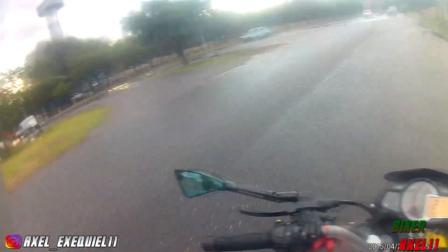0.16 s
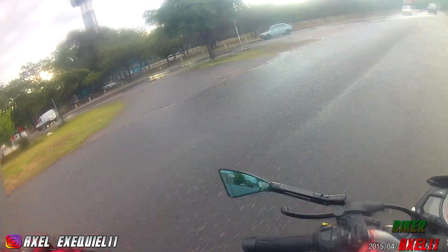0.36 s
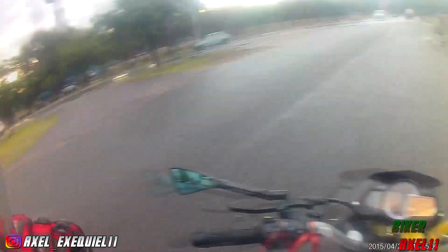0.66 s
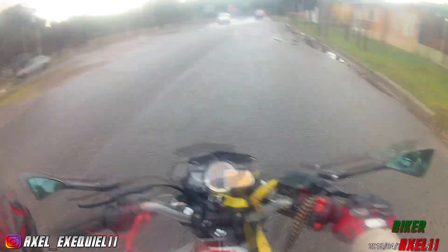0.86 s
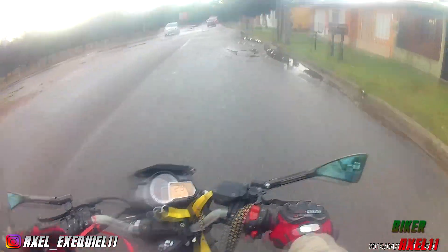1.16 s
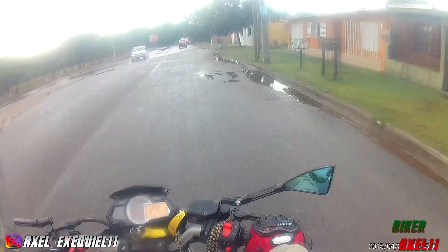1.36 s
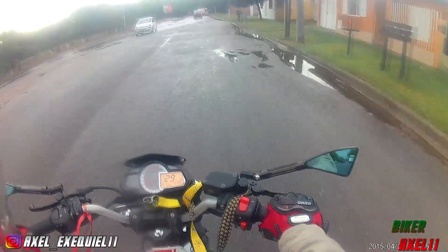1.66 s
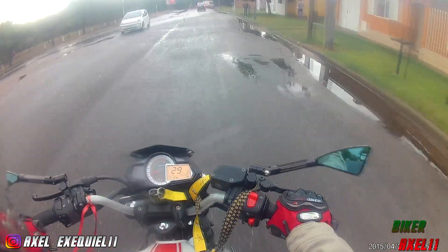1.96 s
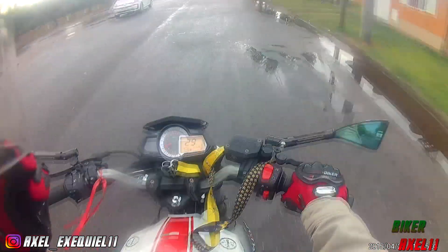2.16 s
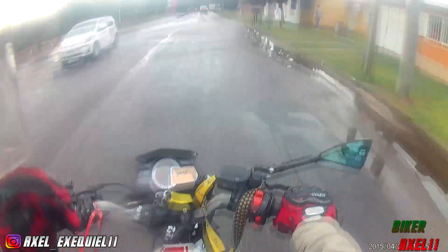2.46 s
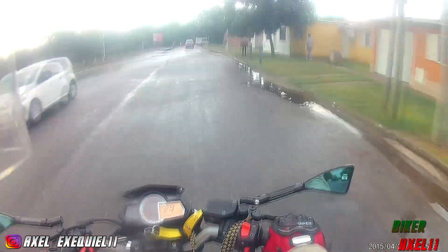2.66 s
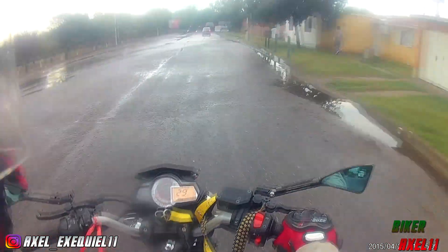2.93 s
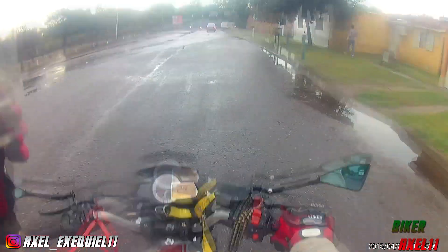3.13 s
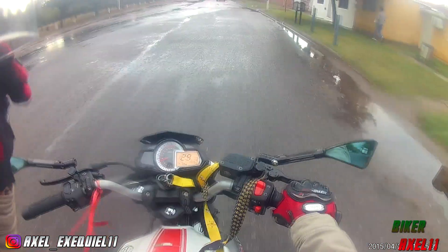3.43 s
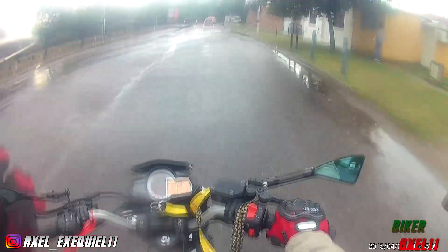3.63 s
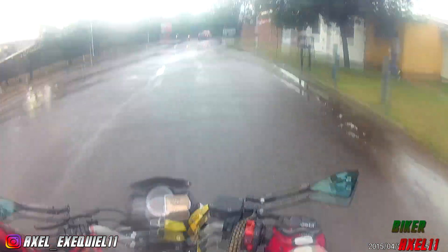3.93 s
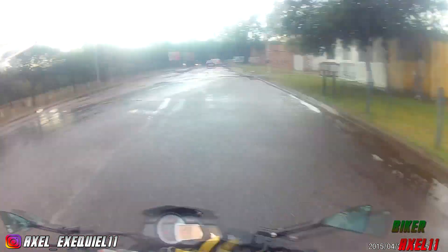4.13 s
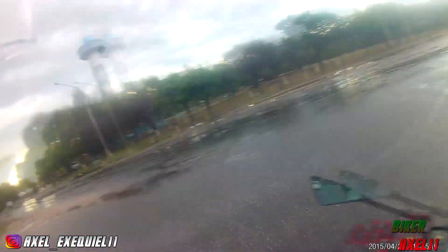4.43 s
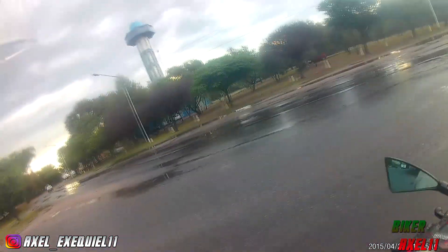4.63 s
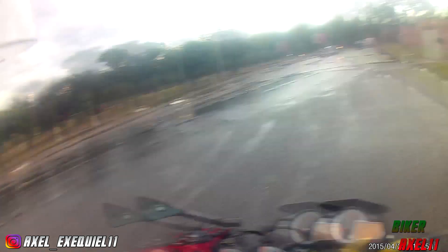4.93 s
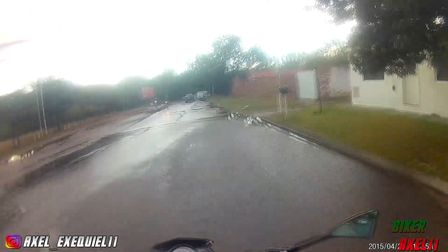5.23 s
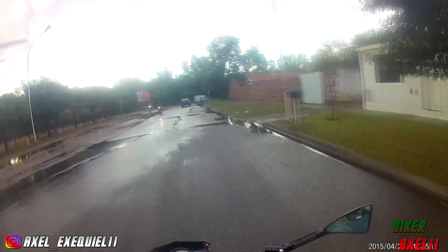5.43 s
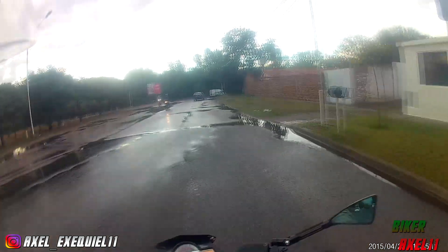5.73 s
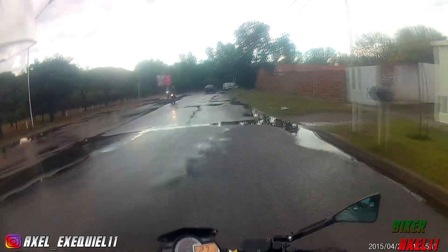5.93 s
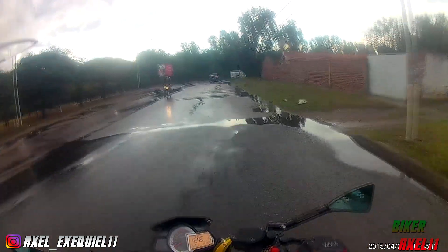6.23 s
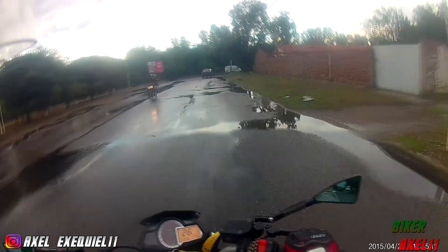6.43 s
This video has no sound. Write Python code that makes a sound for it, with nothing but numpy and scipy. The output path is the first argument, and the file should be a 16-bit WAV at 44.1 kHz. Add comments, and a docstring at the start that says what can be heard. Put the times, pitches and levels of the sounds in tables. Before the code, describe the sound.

Dull, booming bumps and plastic knocks jostle a camera case on a motorcyclist's helmet, the microphone shut inside. The bumps grow heavier, joined by two short runs of sharp clicks, and mostly stop after about four seconds. Underneath, tyres hiss softly on the wet road and the engine slowly winds down, both muffled. Wind and whirring rise near the start and again toward five seconds.

```python
"""Motorcycle on a wet street

A single-cylinder motorcycle coasts, heard from inside a sealed camera case on the rider's helmet.
Jolts excite the low modes of the helmet as thumps and scuff the case; a plastic ratchet joint slips
in short runs of sharp clicks. Tyre hiss, wind and the slowing engine arrive muffled by the case wall,
and hiss, wind and gear whirr swell when the rider looks aside."""
import sys
import numpy as np
from scipy import signal
from scipy.fft import rfft, irfft
from scipy.io import wavfile

SR = 44100
rng = np.random.default_rng(int(sys.argv[2]) if len(sys.argv) > 2 else 0)


def log_audio(samples):
    """Write samples as a 16-bit WAV file to the path given in sys.argv[1]."""
    # one column per channel
    frames = np.atleast_2d(samples).T
    # limit to full scale, then quantise
    limited = np.clip(frames, -1, 1)
    pcm = np.round(limited * 32767).astype(np.int16)
    wavfile.write(sys.argv[1], SR, pcm)


N = 290206
TIME = np.arange(N) / SR

# jolts that shake the helmet and scuff the case: start_s, thump_db, shudder_hz, swell_s, scuff_db
JOLTS = [(.399, -24, 108.7, 0.015, -54), (.634, -21.5, 125, 0.0098, -61), (0.672, -25.5, 158.4, 0.013, -41),
         (0.846, -22.5, 94.5, 0.0094, -36), (.872, -15.5, 172, 0.0062, -34),
         (1.63, -25.5, 186, 0.0071, -34.5), (1.642, -26, 121, 0.012, -35.5), (1.799, -28, 163, 0.0047, -40),
         (1.977, -35, 135.5, .013, -62), (2.047, -17.5, 122, 0.0036, -27.5),
         (2.084, -16.5, 125, 0.015, -40.5), (2.106, -8, 155.4, 0.0079, -20.5),
         (2.192, -16.5, 117, 0.004, -26), (2.371, -15, 180, .012, -33), (2.397, -14.5, 142.2, 0.018, -61.5),
         (3.049, -35, 145, 0.014, -45.5), (3.211, -5, 144, 0.0063, -13), (3.228, -12, 198.7, 0.011, -20.5),
         (3.255, -7.5, 189, 0.0087, -9.5), (3.555, -36, 169, 0.008, -39), (3.697, -14, 149, 0.0075, -26.5),
         (3.981, -32, 103.3, 0.018, -67), (4.484, -28.5, 131.5, 0.0082, -57)]
# the camera rocking on its mount after heavier jolts: start_s, level_db, rocking_hz
SWAYS = [(0.414, -24, 55), (0.692, -30, 51), (.86, -16.5, 51), (1.648, -31, 45.2), (2.109, -18, 73),
         (2.149, -14, 44.6), (3.178, -16.5, 51), (3.247, -10.5, 54), (3.714, -20, 78), (3.738, -22, 44)]
# hard plastic parts striking together: start_s, knock_db, edge_db
CLACKS = [(0.41, -47, -43.5), (0.65, -16, -39), (.667, -26, -32), (.695, -39.5, -53), (1.646, -34.5, -47),
          (3.269, -14.5, -23), (3.279, -18.5, -32), (3.7203, -29.5, -41.5), (3.728, -28, -44)]
# longer rubs on the case: start_s, knock_db, body_db, edge_db, decay_s
RUBS = [(0.392, -31.5, -45, -47, 0.016), (.52, -37.5, -65.5, -51.5, 0.11), (2.021, -33, -33.5, -53.5, 0.12),
        (2.356, -41.5, -33, -70, 0.022), (3.178, -33.5, -31.5, -48, 0.072), (3.246, -22, -32, -37, 0.0078),
        (3.778, -39.5, -39.5, -52.5, 0.073), (3.95, -43, -69, -48.5, 0.041)]
# slips of the ratchet: start_s, tooth_count, first_gap_s, relative_db, loudest_fraction
SLIPS = [(2.1316, 1, .025, -36.5, .5), (2.194, 4, .027, -34.5, .42), (3.213, 7, .0229, -29, .54),
         (3.415, 1, .025, -41.5, .5), (3.7554, 1, .025, -45, .5)]

# low modes of the helmet and its mount: pitch_hz, gain_db, t60_s
HELMET_MODES = [(42.85, 0, 0.46), (70.8, -12.5, 1), (109.6, -1, 0.45), (145.35, 0.5, 0.31), (159, 5, 0.1),
                (194.7, -12.5, 0.19), (237.3, -10, 0.11), (286.4, -15.5, 0.13), (413.6, -2, 0.1)]
# modes of the plastic case: pitch_hz, gain_db, t60_s
CASE_MODES = [(640, -13, 0.019), (748, 0.5, 0.022), (790, -7.5, 0.015), (905, -22, 0.0086),
              (1180, -3.5, 0.022), (1125, -7.5, 0.019), (1392, 11, 0.012), (1607, -0.5, 0.02),
              (1724, 15, 0.0077), (1956, 4, 0.02), (2020, -13.5, 0.0091)]
# mode of the air inside the case: pitch_hz, gain_db, t60_s
CAVITY_MODES = [(439.1, 0, 0.2)]
# modes of the ratchet's pawl: pitch_hz, gain_db, t60_s
PAWL_MODES = [(1456, 7.5, 0.025), (1542, 8, 0.025), (1920, -2, 0.033), (2255, 4, 0.016),
              (2690, -16.5, 0.018), (4080, -9.5, 0.012), (4520, 0.5, 0.0086), (5250, -8, 0.023),
              (5690, -13.5, 0.02), (6640, -11.5, 0.0062), (10200, -14, 0.0099), (12700, -19.5, .007),
              (14500, -20.5, .007)]

# the rider's looks to the side: middle_s, half_length_s
HEAD_TURNS = [(0.496, .28), (4.696, .37)]
# steady layers: base_db, fall_db (per tenth of the starting speed lost), head_turn_rise_db
WIND_LEVELS = (-51.5, 0.34, 5.9)
SPRAY_LEVELS = (-54, 1, 1.14)
FIZZ_LEVELS = (-69.5, 4.2, 0.29)
GEAR_LEVELS = (-59.5, -0.25, 4.4)
# spectrum of wet tyres through the case wall: frequency_hz, relative_db
MUFFLED_SPECTRUM = [(200, 4), (440, -1.5), (540, -1), (750, -1.5), (970, -4), (1120, -2), (1350, 4),
                    (1550, -3), (1800, 1), (2000, -4.5), (2350, -14), (3100, -26), (4200, -21.5),
                    (5300, -37.5), (7600, -35)]

# firing rate of the slowing engine: time_s, rate_hz
FIRING_RATE = [(0, 38.8), (1.35, 37.32), (2.85, 36.34), (4.25, 34.58), (4.75, 33.96), (5.3, 33.48),
               (5.8, 33.14), (6.58, 33)]
# harmonics of the firing rate in the exhaust: harmonic_number, base_db
EXHAUST_HARMONICS = [(2, -65.5), (3, -63.5), (4, -54), (6, -59.5), (8, -54.5), (9, -68.5), (10, -81.5),
                     (11, -70.5), (12, -69), (13, -68.5)]
# gain on all the exhaust harmonics: time_s, gain_db
EXHAUST_GAIN = [(0, -1.5), (1.4, -3), (2.9, -3.5), (4.8, -12), (5.4, -10), (6.58, -21)]
# spells of loud valve ticking: middle_s, half_length_s, gain_db
VALVE_SPELLS = [(.33, 0.83, -56), (5.0, 0.088, -57), (6.35, 0.45, -57.5)]
# spectrum of the electronic hiss: frequency_hz, relative_db
SELF_NOISE_SPECTRUM = [(3000, 5), (9200, -3.5), (12600, -3), (13500, -19), (14400, 0.5), (15700, -15.5)]


def jolts(lead_share=0.21, scuff_share=1.46, body_offset_db=-6, edge_offset_db=-21, sway_swell_s=0.021):
    """Shock excitation: the helmet shudders, the case scuffs, and after heavier jolts the mount sways."""
    out = np.zeros(N)
    for start_s, thump_db, shudder_hz, swell_s, scuff_db in JOLTS:
        add(out, start_s - lead_share * swell_s, thump(thump_db, shudder_hz, swell_s))
        body_db = (thump_db + scuff_db) / 2 + body_offset_db
        add(out, start_s, scuff(scuff_db, body_db, scuff_db + edge_offset_db, scuff_share * swell_s))
    for start_s, level_db, rocking_hz in SWAYS:
        add(out, start_s, thump(level_db, rocking_hz, sway_swell_s))
    return out


def thump(level_db, shudder_hz, swell_s, ring_db=-3, crunch_db=-6, brisk_hz=150):
    """Forced vibration: a few cycles of force set the helmet ringing; faster shudders crunch more."""
    t = np.arange(SR * 3 // 4) / SR
    helmet = ring(HELMET_MODES, 0.62)
    force = (t / swell_s) ** 2 * np.exp(-2 * t / swell_s)
    shudder = peaked(force * np.sin(2 * np.pi * shudder_hz * t))
    ringing = peaked(excite(helmet, shudder))
    rattle = excite(helmet, force * rng.standard_normal(len(t)))
    crunch = peaked(band(rattle, 170, 380, order=2)) * shudder_hz / brisk_hz
    motion = peaked(shudder + amp(ring_db) * ringing + amp(crunch_db) * crunch)
    return amp(level_db) * band(motion, 12, 4000, order=2)


def scuff(knock_db, body_db, edge_db, decay_s, grit_db=4, snap_s=0.0026, muffle_hz=1930, cavity_s=0.071):
    """Stick-slip friction: a snap and tiny slips ring the case, which passes little above 2 kHz."""
    t = np.arange(SR // 3) / SR
    grit = np.repeat(rng.standard_normal(len(t)), 30)[:len(t)]  # grains of 30 samples
    slips = rng.standard_normal(len(t)) * amp(grit_db * grit)
    slips *= np.exp(-t / decay_s) + 3 * snap_s / decay_s * np.exp(-t / snap_s)  # brief ones snap hardest
    slips *= 1 - np.exp(-t / (0.053 * decay_s))  # long rubs start softly
    tilt_db_per_octave = 0.75 * (knock_db - body_db)  # a hard contact favours the upper modes
    modes = [(hz, db + tilt_db_per_octave * np.log2(hz / muffle_hz), t60) for hz, db, t60 in CASE_MODES]
    shell = evened(excite(ring(modes, 0.2, scatter=0.82), slips)) + amp(-6) * evened(slips)
    body = amp(body_db) * peaked(band(shell, 300, 830, order=3))
    knock = amp(knock_db) * peaked(band(shell, 1020, muffle_hz, order=5))
    edge = amp(edge_db) * peaked(band(slips, 2120, 4090, order=5))
    cavity = ring(CAVITY_MODES, 1, scatter=0.9)[:len(t)]
    cavity *= (1 - np.exp(-t / decay_s)) * np.exp(-t / cavity_s)  # builds up, damped by the contact
    return body + knock + edge + amp(body_db - 6.5) * peaked(cavity)


def contacts(clack_decay_s=0.003, body_offset_db=-9):
    """Impact and friction: brief clacks and longer rubs ring the case without shaking the helmet."""
    out = np.zeros(N)
    for start_s, knock_db, edge_db in CLACKS:
        add(out, start_s, scuff(knock_db, knock_db + body_offset_db, edge_db, clack_decay_s))
    for start_s, *rub in RUBS:
        add(out, start_s, scuff(*rub))
    return out


def ratchet(gain_db=6, rebound_s=0.00085, rebound_db=-7, crack_db=-10, crack_s=0.0014, rise_s=0.00022):
    """Impulse response: each tooth snaps the pawl, which cracks, rings and rebounds once."""
    out = np.zeros(N)
    t = np.arange(SR // 10) / SR
    for start_s, tooth_db in teeth():
        strength = amp(tooth_db + gain_db)
        crack = band(rng.standard_normal(len(t)), 1500, 4900, order=2) * np.exp(-t / crack_s)
        add(out, start_s, strength * amp(crack_db) * peaked(crack))
        for delay_s, drop_db in (0, 0), (rebound_s, rebound_db):
            pawl = ring(PAWL_MODES, 0.2, scatter=0.96)[:len(t)] * (1 - np.exp(-t / rise_s))
            add(out, start_s + delay_s, strength * amp(drop_db) * peaked(pawl))
    return out


def teeth(gap_growth_s=0.0009, fade_db=-70.5):
    """Deceleration: a slip slows as its force swells and fades. Yields start_s, tooth_db per tooth."""
    for start_s, count, first_gap_s, relative_db, loudest_fraction in SLIPS:
        tooth = np.arange(round(count))
        times_s = start_s + first_gap_s * tooth + gap_growth_s * tooth * (tooth - 1) / 2
        fraction = (tooth + 0.5) / len(tooth)
        yield from zip(times_s, relative_db + fade_db * (fraction - loudest_fraction) ** 2)


def wind(gust_db=1.17, corner_hz=120, rumble_db=-10, unrest_db=-45, unrest_s=0.13, lag_s=0.05):
    """Turbulent pressure drives the helmet's low modes, the more while it still moves from a jolt."""
    pressure = signal.lfilter([1], [1, -np.exp(-2 * np.pi * corner_hz / SR)], rng.standard_normal(N))
    shake = evened(excite(ring(HELMET_MODES, 0.7), pressure))
    rumble = evened(band(rng.standard_normal(N), 22, 63, order=2))  # gusts press on the case itself
    unrest = np.sqrt(sum(np.exp(-((TIME - start_s - lag_s) / unrest_s) ** 2) for start_s, *_ in JOLTS))
    strength = np.hypot(amp(ride_db(*WIND_LEVELS)), amp(unrest_db) * unrest)
    return (shake + amp(rumble_db) * rumble) * strength * amp(gust_db * drift(6.9))


def tyres(hiss_gain_db=2.37, flutter_db=0.54, grain_db=1.93):
    """Spray noise: water torn from the road hisses and fizzes, easing as the motorcycle slows."""
    hiss = noise(MUFFLED_SPECTRUM)
    hiss *= amp(ride_db(*SPRAY_LEVELS) + hiss_gain_db + flutter_db * drift(6.9) + grain_db * drift(180))
    fizz = evened(band(rng.standard_normal(N), 3200, 4900, order=3))
    fizz *= amp(ride_db(*FIZZ_LEVELS) + grain_db * drift(120))
    return hiss + fizz


def engine(wobble=0.00053):
    """Periodic excitation: exhaust, gears and valves all follow the firing rate."""
    cycles = np.cumsum(curve(FIRING_RATE) * (1 + wobble * drift(5.0))) / SR
    return exhaust(cycles) + gears(cycles) + valves(cycles)


def exhaust(cycles, waver_db=2.5):
    """Harmonic series: regular firings give tones at multiples of their rate, each wavering in level."""
    tones = sum(amp(db + waver_db * drift(2.6)) * harmonic(cycles, round(number))
                for number, db in EXHAUST_HARMONICS)
    return tones * amp(curve(EXHAUST_GAIN))


def gears(cycles, even_db=5, mesh_order=32, mesh_db=7, waver_db=4.5):
    """Tooth meshing: gears and cam chain whirr on high engine orders, muffled like the tyres."""
    orders = np.arange(15, 60)
    gains = spectrum_gain(MUFFLED_SPECTRUM, orders * curve(FIRING_RATE).mean())
    gains *= amp(even_db * (orders % 2 == 0) + mesh_db * (orders == mesh_order))
    whirr = sum(gain * amp(waver_db * drift(2.07)) * harmonic(cycles, order)
                for order, gain in zip(orders, gains))
    return evened(whirr) * amp(ride_db(*GEAR_LEVELS))


def valves(cycles, pitch_hz=4100, turn_hz=300, chirp_hz=70, width_hz=260, tick_s=0.0029, quiet_db=-70.5):
    """Damped ringing: one soft metallic tick per engine cycle, rising a little in pitch as it dies."""
    age = (cycles % 1) / curve(FIRING_RATE) / tick_s  # in time constants
    strength = amp(quiet_db) + sum(amp(db) * spell(middle, half) for middle, half, db in VALVE_SPELLS)
    uneven = amp(0.2 * rng.standard_normal(N)[cycles.astype(int)])
    tick_hz = pitch_hz + turn_hz * head_turn() ** 2 + chirp_hz * (age - 2)
    phase = 2 * np.pi * np.cumsum(tick_hz) / SR
    # slow noise on both quadratures widens the tone into a band
    lowpass = signal.butter(2, width_hz, fs=SR, output="sos")
    fuzz_cos, fuzz_sin = (evened(signal.sosfilt(lowpass, white)) for white in rng.standard_normal((2, N)))
    metal = evened((1 + fuzz_cos) * np.cos(phase) + fuzz_sin * np.sin(phase))
    return metal * age * np.exp(-age) * strength * uneven


def case_hum(level_db=-61, waver_db=1):
    """Cavity resonance: road vibration keeps the air inside the case sounding."""
    hum = excite(ring(CAVITY_MODES, 0.35), rng.standard_normal(N))
    return evened(hum) * amp(level_db + waver_db * drift(0.44))


def ride_db(base_db, fall_db, head_turn_rise_db):
    """Level of a layer that follows the speed and the turn of the head."""
    rate_hz = curve(FIRING_RATE)
    tenths_lost = 10 * (1 - rate_hz / rate_hz[0])
    return base_db - fall_db * tenths_lost + head_turn_rise_db * head_turn()


def head_turn():
    """0 facing ahead, 1 looking to the side."""
    return sum(spell(*turn) for turn in HEAD_TURNS)


def spell(middle_s, half_length_s):
    """A smooth, flat-topped rise from 0 to 1 and back."""
    return np.exp(-((TIME - middle_s) / half_length_s) ** 4)


def ring(modes, length_s, scatter=0):
    """Free decay of modes; scatter 0-1 shuffles their phases, as when the point of contact moves."""
    t = np.arange(int(length_s * SR)) / SR
    return sum(amp(db - 60 * t / t60) * np.sin(2 * np.pi * (hz * t + scatter * rng.random()))
               for hz, db, t60 in modes)


def excite(response, force):
    """Convolution of a force with an impulse response, cut to the length of the force."""
    return signal.fftconvolve(force, response)[:len(force)]


def harmonic(cycles, number):
    """A sine of random phase at a multiple of the cycle rate."""
    return np.sin(2 * np.pi * (number * cycles + rng.random()))


def noise(spectrum):
    """Noise of rms 1 with a spectrum that falls away beyond its ends."""
    hz = np.fft.rfftfreq(N, 1 / SR) + 1
    ends = 1 / (1 + (spectrum[0][0] / 2 / hz) ** 4) / (1 + (hz / spectrum[-1][0]) ** 20)
    return evened(irfft(rfft(rng.standard_normal(N)) * spectrum_gain(spectrum, hz) * ends, N))


def spectrum_gain(spectrum, hz):
    """Gain at hz, interpolated on a logarithmic frequency axis."""
    points_hz, points_db = np.transpose(spectrum)
    return amp(np.interp(np.log(hz), np.log(points_hz), points_db))


def drift(corner_hz, size=4096):
    """Random fluctuation of rms 1, low-passed at corner_hz."""
    hz = np.fft.rfftfreq(size, N / SR / size)
    slow = evened(irfft(rfft(rng.standard_normal(size)) * (hz > 0) / (1 + (hz / corner_hz) ** 4)))
    return np.interp(TIME, np.linspace(0, N / SR, size), slow)


def band(x, lo_hz, hi_hz, order=4):
    """Causal band-pass."""
    return signal.sosfilt(signal.butter(order, [lo_hz, hi_hz], "band", fs=SR, output="sos"), x)


def curve(rows):
    """Linear interpolation of time_s, value rows."""
    return np.interp(TIME, *np.transpose(rows))


def add(mix, start_s, sound):
    """Superposes a sound on the mix."""
    part = mix[max(round(start_s * SR), 0):][:len(sound)]
    part += sound[:len(part)]


def amp(db):
    """Decibels to gain."""
    return 10 ** (np.asarray(db) / 20)


def evened(x):
    """Scales to rms 1."""
    return x / np.sqrt(np.mean(x ** 2) + 1e-20)


def peaked(x):
    """Scales to peak 1."""
    return x / (abs(x).max() + 1e-20)


def scene():
    """Superposition: all sources add at the one microphone inside the case."""
    return (tyres() + wind() + case_hum() + engine() + jolts() + contacts() + ratchet())[None]


def record(dry, hiss_db=-73, whine_db=-89, whine_hz=13030, notch_depth=0.58, cutoff_hz=15750):
    """Self-noise and response: electronic hiss and whine, a microphone dip near 8 kHz, a band limit."""
    whine = amp(whine_db) * evened(band(rng.standard_normal(N), whine_hz - 60, whine_hz + 60, order=2))
    noisy = dry + whine + amp(hiss_db) * noise(SELF_NOISE_SPECTRUM)
    notched = noisy - notch_depth * band(noisy, 7300, 8500, order=1)
    lowpass = signal.firwin(511, cutoff_hz, window=("kaiser", 9), fs=SR)
    return signal.oaconvolve(notched, lowpass[None], "same")


dry = scene()
out = record(dry)
log_audio(out)
```